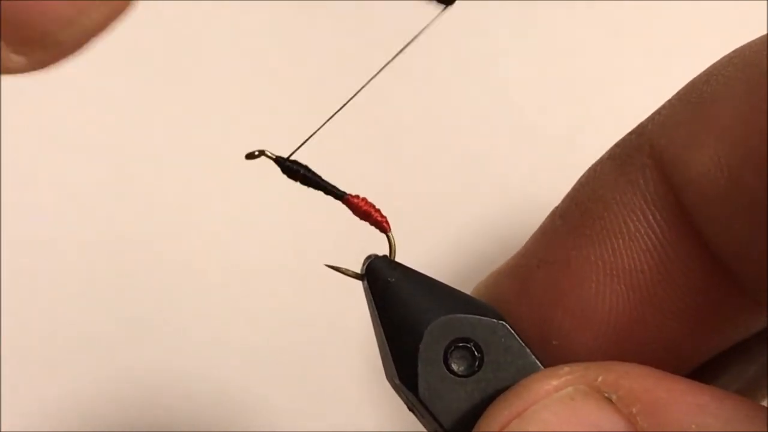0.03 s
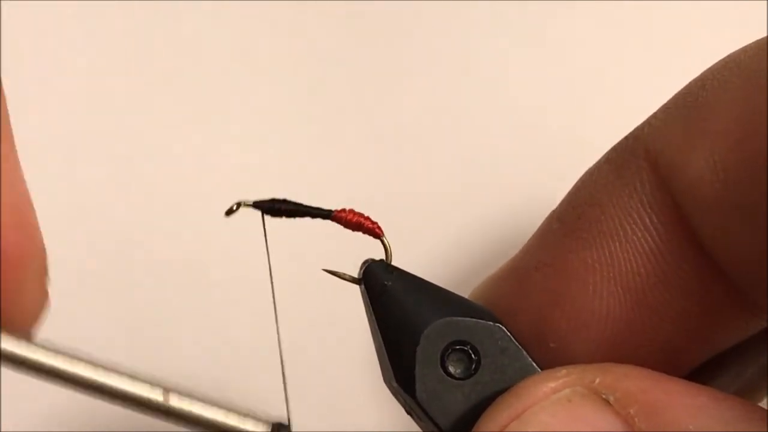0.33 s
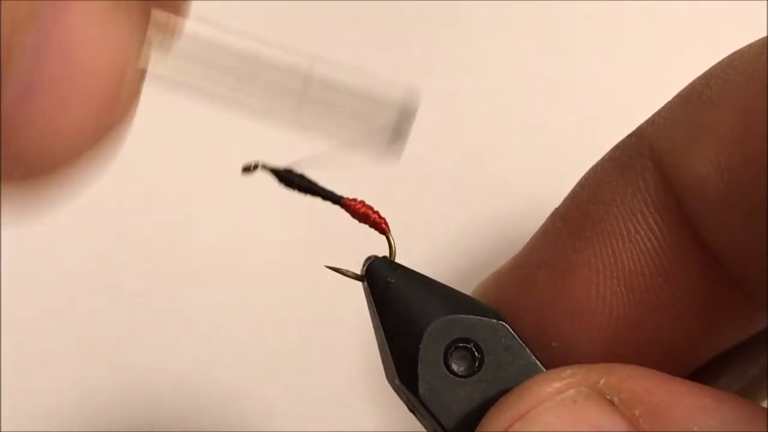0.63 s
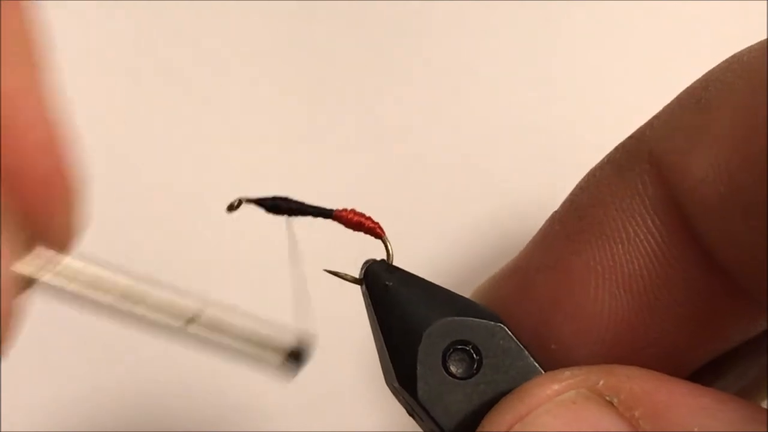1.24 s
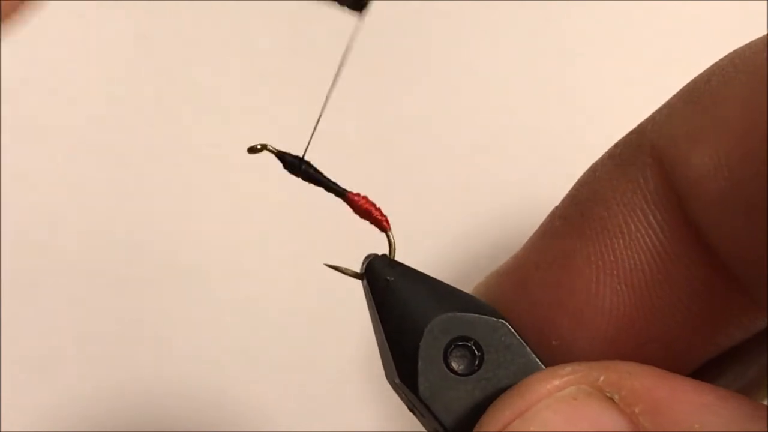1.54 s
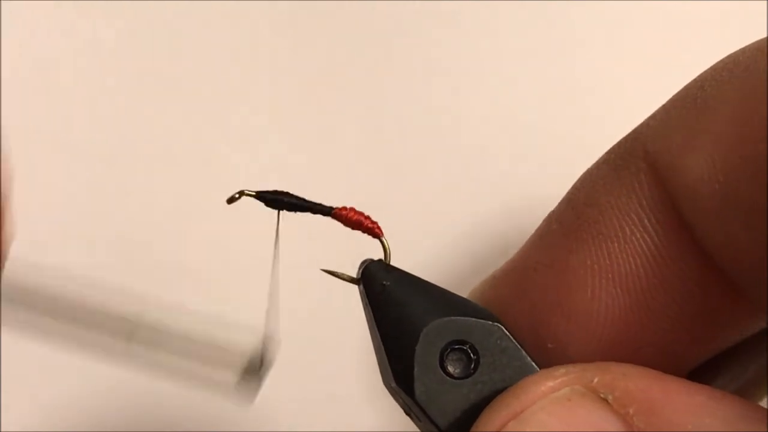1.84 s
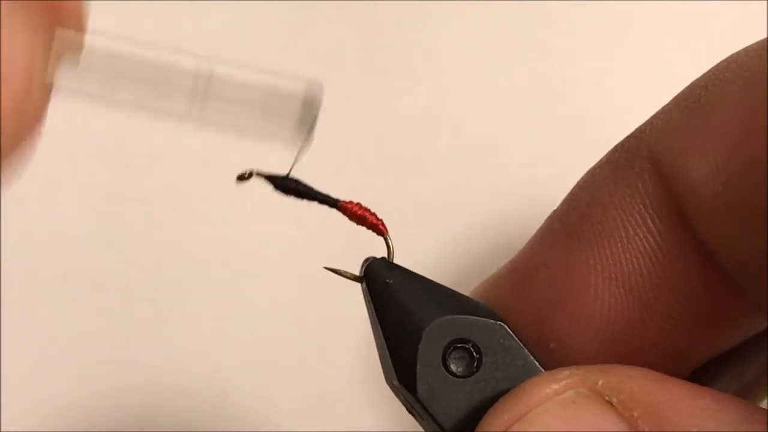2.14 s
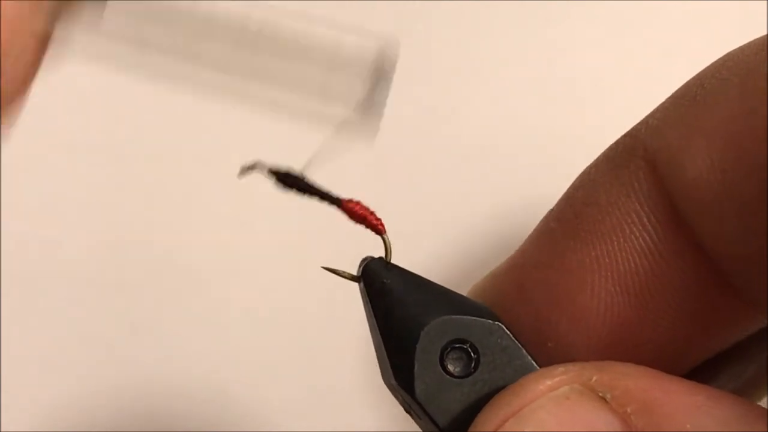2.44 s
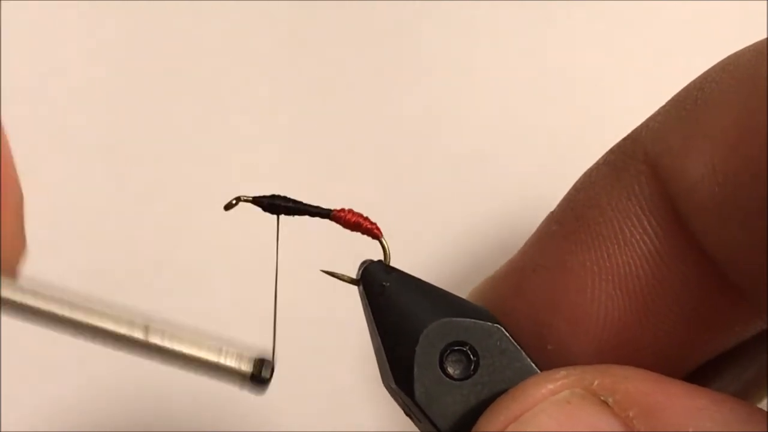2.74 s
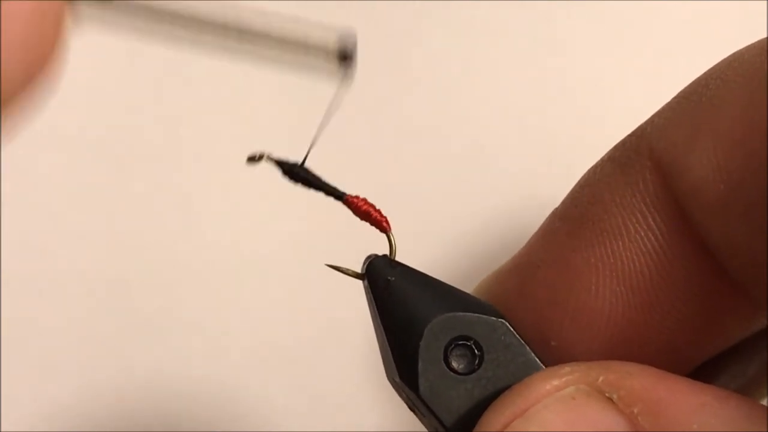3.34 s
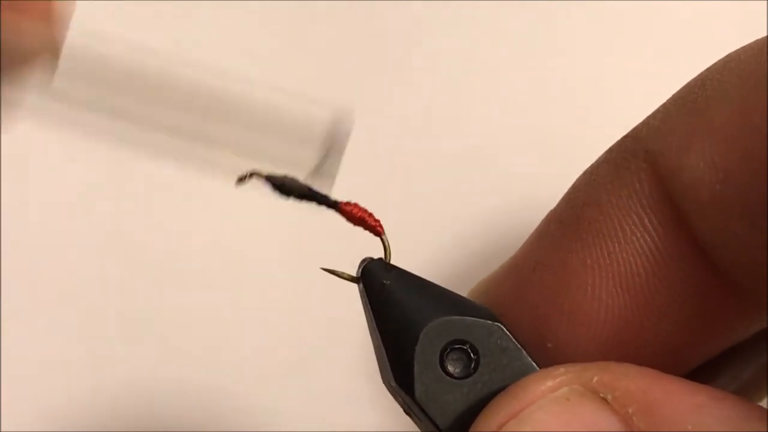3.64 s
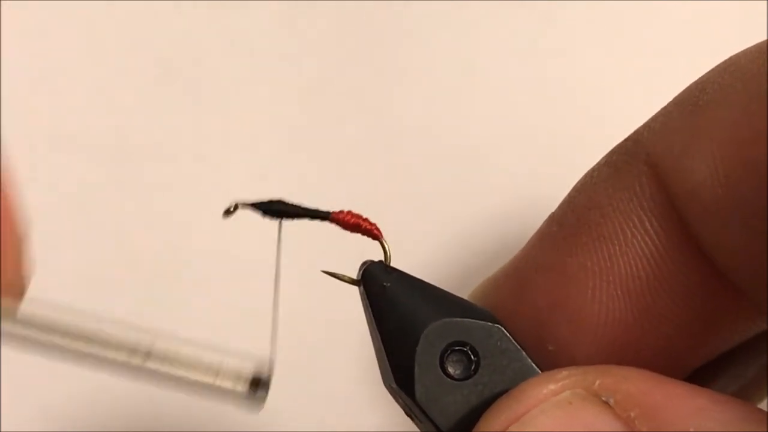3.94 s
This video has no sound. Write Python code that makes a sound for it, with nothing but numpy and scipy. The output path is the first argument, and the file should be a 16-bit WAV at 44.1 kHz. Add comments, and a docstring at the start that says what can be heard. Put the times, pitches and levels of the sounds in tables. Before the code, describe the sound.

A thread spool creaks close by in high, raspy runs of rapid ticks, about two bursts a second, with the taut thread and hook ringing faintly. The creaks are strongest and nearly continuous until about 1.7 seconds, then become shorter and fainter, with quicker ticks. At about 3.9 seconds the tool clicks, fingers rub it and a hand softly bumps the vice. A small room hums faintly throughout.

```python
"""A spool creaks in its wire holder as thread is wound round a small hook in a vice, about two turns a second.
The spool sticks and slips, and each slip is a short tick near 4 kHz. The ticks run together into
creaks, slow and strong at first, then faster and fainter. The taut thread and the hook ring along.
Near the end the tool clicks, fingers rub it and a hand bumps the vice. A small room hums."""
import sys
import numpy as np
from scipy import signal
from scipy.fft import rfft, irfft, next_fast_len
from scipy.io import wavfile
from scipy.ndimage import uniform_filter1d, map_coordinates

SR = 44100
rng = np.random.default_rng(int(sys.argv[2]) if len(sys.argv) > 2 else 0)


def put_to_file(sound):
    """Save the sound as 16-bit audio at rate SR, in the file named by the first command-line argument."""
    columns = np.atleast_2d(sound).T  # one column per channel
    safe = np.clip(columns, -1, 1)
    whole_steps = np.round(safe * 32767)
    wavfile.write(sys.argv[1], SR, whole_steps.astype(np.int16))


N = 176400

# how the spool slips, one list for each creak: time_s, slips_per_s, strength_db
SPOOL_CREAKS = [
    [(0.0087, 101.7, -38), (0.0193, 81.8, -34), (0.0468, 65.8, -33)],
    [(0.0876, 77.1, -35), (0.101, 73.2, -31), (0.1728, 66.5, -36), (0.2183, 63.2, -45), (0.2677, 59.8, -39),
     (0.3073, 91.6, -34), (0.3284, 97.0, -37), (0.35, 87.0, -32), (0.3944, 93.8, -35), (0.4294, 77.9, -50),
     (0.465, 87.1, -51)],
    [(0.4979, 146.5, -50), (0.5207, 115.6, -44), (0.5866, 96.5, -32), (0.598, 80.9, -29),
     (0.6437, 95.8, -31), (0.7116, 51.1, -37), (0.7279, 75.8, -41), (0.7651, 82.0, -41),
     (0.7795, 57.6, -39), (0.8122, 66.1, -32), (0.8369, 97.0, -31), (0.8657, 108.3, -32),
     (0.8978, 79.0, -36), (0.9105, 82.1, -36), (0.9602, 114.0, -52)],
    [(0.9775, 118.7, -50), (1.0205, 115.7, -50), (1.0372, 119.1, -38), (1.0455, 117.0, -40),
     (1.063, 115.8, -33), (1.072, 98.2, -39), (1.1181, 77.7, -36), (1.1713, 70.0, -38), (1.2077, 98.2, -47),
     (1.2382, 95.2, -45), (1.2502, 69.8, -42), (1.2979, 98.5, -34), (1.3465, 66.5, -32), (1.4, 120.8, -38),
     (1.4284, 159.7, -44), (1.4692, 141.1, -58)],
    [(1.5092, 152.8, -44), (1.5267, 190.8, -39), (1.5525, 195.0, -33), (1.5763, 140.7, -40),
     (1.5984, 133.4, -35), (1.6279, 134.8, -42), (1.6356, 128.9, -38), (1.6755, 168.7, -44),
     (1.6896, 146.2, -58)],
    [(1.7597, 163.1, -53), (1.8091, 162.1, -45), (1.8388, 241.4, -47), (1.843, 225.8, -50),
     (1.8524, 188.9, -44), (1.8651, 142.5, -49)],
    [(1.8885, 107.9, -50), (1.9263, 156.0, -46), (1.9317, 210.8, -50), (1.9545, 229.5, -62)],
    [(2.0638, 174.7, -53), (2.121, 140.7, -62), (2.1283, 127.3, -54), (2.1443, 122.6, -55)],
    [(2.2829, 151.2, -57), (2.327, 168.2, -38), (2.358, 159.5, -48), (2.3623, 172.2, -60)],
    [(2.3961, 105.0, -51), (2.43, 130.3, -42), (2.4374, 151.6, -47), (2.4434, 166.0, -44),
     (2.4659, 179.1, -59)],
    [(2.6223, 125.9, -59), (2.6491, 99.8, -54), (2.7155, 164.2, -49), (2.7473, 105.4, -43),
     (2.7694, 158.3, -48), (2.7762, 137.3, -42), (2.8109, 153.1, -43), (2.8422, 161.7, -51),
     (2.8487, 180.1, -59), (2.8734, 214.8, -57)],
    [(3.0117, 168.7, -55), (3.0176, 145.6, -50), (3.0305, 171.7, -49), (3.1193, 147.1, -62)],
    [(3.1409, 167.9, -49), (3.1666, 222.0, -48), (3.179, 266.3, -38), (3.1926, 316.4, -40),
     (3.1956, 324.0, -44)],
    [(3.3666, 349.4, -53), (3.3815, 331.7, -42), (3.3957, 366.6, -59)],
    [(3.4878, 155.6, -62), (3.5351, 179.3, -51), (3.5547, 134.6, -41), (3.5788, 199.6, -44),
     (3.5833, 188.8, -56), (3.6089, 139.7, -58)],
    [(3.7906, 203.1, -57), (3.7955, 199.6, -48), (3.8272, 243.6, -45), (3.835, 259.0, -59)],
    [(3.9724, 155.5, -54), (3.996, 181.6, -49)],
]
# the holder's main and lower rings: base_pitch_hz, relative_db, rise_s, fall_s
HOLDER_RINGS = [(3872, 0, .00046, 0.00062), (4600, -13.5, 0.00032, 0.0014), (3643, -29, 0.00074, 0.0054)]
HOLDER_LOW_RINGS = [(2853, -16, 0.0012, 0.00034), (2242, -25, 0.00066, 0.0013)]
# how much the lower rings are turned up or down: time_s, gain_db
LOW_RING_GAIN = [(.03, -1.5), (.2, -1.5), (.37, -4), (.6, -2.5), (.82, -3), (.95, 4), (1.12, 2.5),
                 (1.35, 4), (1.6, 6), (1.82, 3.5), (1.93, 10), (2.33, 1), (2.75, 1.5), (3.05, 9), (3.2, -5),
                 (3.8, 1)]
# the noisy snap of a slip: frequency_hz, relative_db
SNAP_SPECTRUM = [(600, 0.5), (2000, -19), (5000, 8), (8000, -8), (10500, -7), (12000, -4), (14000, -2),
                 (15500, -11)]
# plucks of the taut thread, one list for each swing: time_s, pitch_hz, pluck_db
THREAD_SWINGS = [
    [(.04, 4600, -51), (.06, 4400, -52), (.085, 4050, -54)],
    [(.14, 4200, -58), (.19, 4070, -50), (.24, 4170, -47), (.31, 3980, -48), (.35, 3600, -48),
     (.4, 3400, -49)],
    [(.61, 4150, -50), (.66, 4150, -49), (.73, 4170, -49), (.78, 4330, -47), (.84, 4080, -44),
     (.855, 3480, -45), (.89, 3380, -50)],
    [(1.12, 4250, -56), (1.19, 4430, -53), (1.24, 4690, -52), (1.3, 4280, -49), (1.34, 4270, -78)],
    [(2.67, 3770, -50), (2.71, 3960, -63), (2.75, 3920, -46), (2.78, 3420, -54)],
    [(3.07, 4100, -65), (3.12, 3830, -65), (3.145, 3850, -54), (3.175, 3340, -65)],
]
# the thread passes under the hook and pulls it down: time_s, width_s, low_ring_db, high_ring_db
HOOK_PULLS = [(.345, 0.046, -60, -64), (0.844, 0.086, -65, -61.5), (1.31, 0.066, -53.5, -57),
              (1.814, .035, -57.5, -63.5), (2.332, 0.015, -58, -62.5), (2.75, 0.055, -77, -75),
              (3.181, .018, -66, -66.5), (3.38, 0.015, -63.5, -72), (3.566, 0.016, -56, -63.5),
              (3.82, .015, -60, -79)]
# the hook's two rings: base_pitch_hz, ring_time_s, ahead_of_pull_s, glide_fraction_per_s
HOOK_RINGS = [(2250, 0.024, 0.0025, -0.21), (6790, 0.025, 0.014, -0.31)]
# the thread slides softly between creaks: time_s, width_s, pitch_hz, level_db
THREAD_SLIDES = [(1.73, 0.01, 4150, -66), (2.238, .012, 3860, -66), (2.292, 0.0068, 3540, -63),
                 (3.21, 0.011, 3830, -78), (3.355, 0.023, 3900, -70), (3.436, .004, 4800, -68)]
# a thin, faint whistle flickers with the ticks: time_s, width_s, pitch_hz, strength_db
HIGH_FLICKERS = [(.24, 0.035, 15000, -60), (.36, .04, 15400, -63), (.74, .04, 14340, -57),
                 (.86, .05, 15700, -58), (1.22, 0.039, 14500, -56), (1.33, .04, 15260, -54),
                 (1.81, 0.016, 15500, -56), (1.92, 0.013, 15000, -60), (2.32, .02, 15700, -60),
                 (2.44, 0.014, 15250, -59), (2.74, 0.044, 15050, -60.5), (3.17, .02, 15100, -67),
                 (3.56, .02, 15600, -61)]
# the tool clicks: time_s, strength_db
TOOL_CLICKS = [(3.873, -33)]
# the rings in that click: base_pitch_hz, relative_db, rise_s, fall_s
TOOL_RINGS = [(1510, 2, 0.00076, 0.0022), (2150, -12, 0.00017, 0.0017), (3060, -19, 0.00031, .0009),
              (4370, -26, .0005, 0.0014), (5170, -24, .0005, 0.00073), (6250, -29, 0.00043, .0008),
              (7770, -30, 0.00063, 0.0023)]
# fingers rub on the tool: time_s, strength_db, rise_s, fade_time_s
FINGER_RUBS = [(3.876, -59, 0.0015, 0.21), (3.914, -42.5, 0.0022, 0.046), (3.929, -60, 0.008, 0.52),
               (3.962, -62.5, 0.0031, 0.75)]
# the noise of that rubbing: frequency_hz, relative_db
RUB_SPECTRUM = [(290, -23), (500, 2), (670, -13), (936, 0.5), (1030, -13), (1110, -13), (1420, 1),
                (1660, -7.5), (2070, 0), (2480, -13), (2980, -3), (5130, -33), (6240, -18), (6780, -23),
                (14000, -24)]
# the hand bumps the vice: time_s, strength_db, pitch_hz, rise_s, fall_s
VICE_BUMPS = [(3.925, -54, 252, 0.00092, 0.0091), (3.94, -50, 45, .002, 0.018)]
# the room's low rumble and faint hiss: frequency_hz, relative_db
RUMBLE_SPECTRUM = [(15, -44), (25, -26.5), (57, -6), (86, -6.5), (118, -3.5), (144, -7), (208, -2.5),
                   (286, -6), (329, -12.5), (414, -12), (512, -24), (667, -24.5), (728, -21.5),
                   (768, -24.5), (900, -21), (1020, -26), (1220, -25.5), (1500, -30.5), (1700, -29.5),
                   (2210, -65), (3740, -120)]
HISS_SPECTRUM = [(1200, -40), (1800, 1), (3000, 1), (4000, -1.5), (5000, -8), (6100, -5), (7500, -10.5),
                 (9000, -6.5), (10600, -12.5), (12000, -3.5), (13000, -12), (15500, -7)]
# the tones of the room's hum: pitch_hz, average_level_db
HUM_TONES = [(101, -69.5), (162, -66), (209, -66), (285, -72), (360, -82.5), (600, -84.5), (720, -82)]

TICK_LEAD_S = 0.003  # a tick peaks this long after it starts


def spool_slips():
    """The spool slips each time it has moved on by one step. Gives (time, strength) pairs."""
    slips = []
    for creak in SPOOL_CREAKS:
        times, rates, levels = np.transpose(creak)
        t = np.arange(times[0], times[-1] + .5 / rates[-1], 1 / SR)
        steps = np.cumsum(np.interp(t, times, rates)) / SR
        slip_times = np.interp(np.arange(int(steps[-1]) + 1), steps, t)
        slips += zip(slip_times, np.interp(slip_times, times, levels))
    jitter_s, uneven_db = 0.00004, 0.6
    return [(s + jitter_s * rng.standard_normal(), amp(db + uneven_db * rng.standard_normal()))
            for s, db in slips]


def holder_ticks(slips):
    """Each slip rings the wire holder. The ticks slowly get lower and softer."""
    sink_per_s, mistune = 0.0099, 0.012  # fractions of the pitch
    out = np.zeros(N)
    for s, strength in slips:
        dip = 0.039 * bell(since_pull(s), centre=0.029, width=0.027)  # pitch drops just after a pull
        main = tick(HOLDER_RINGS, tuning=1 - sink_per_s * s + mistune * rng.standard_normal() - dip)
        low = tick(HOLDER_LOW_RINGS, tuning=1 + mistune * rng.standard_normal())
        low_gain = amp(np.interp(s, *np.transpose(LOW_RING_GAIN)))
        add(out, s - TICK_LEAD_S, strength * (main + low_gain * low))
    easing_db = -1 - 0.17 * clock()
    return amp(easing_db) * out


def slip_snaps(kicks):
    """Each slip also makes a faint snap of noise, rougher round each downward pull."""
    t = clock()
    level_db = -32 - 2.5 * t + 3.5 * bell(since_pull(t), centre=0, width=0.073)
    bursts = fade(kicks ** 0.56, fade_time_s=0.0067)  # the snap grows less than the slip does
    spread_s = 0.0028
    softened = uniform_filter1d(bursts, int(spread_s * SR))
    return amp(level_db) * softened * noise(SNAP_SPECTRUM)


def taut_thread(kicks):
    """Slips pluck the taut thread; its pitch rises and falls with each swing."""
    t, out = clock(), np.zeros(N)
    scatter_db = 2
    for swing in THREAD_SWINGS:
        times, pitches, levels = np.transpose(swing)
        plucked = (kicks > 0) * (t > times[0]) * (t < times[-1])
        strength = amp(np.interp(t, times, levels) + scatter_db * rng.standard_normal(N))
        out += ring(plucked * strength, np.interp(t, times, pitches), ring_time_s=0.036)
    return out


def hook(kicks):
    """Slips ring the hook while the thread pulls it down; the pitch slides down through each pull."""
    out, slip_samples = np.zeros(N), np.flatnonzero(kicks)
    for k, (hz, ring_time_s, ahead_s, glide) in enumerate(HOOK_RINGS):
        tugs = np.zeros(N)
        for s, width, *ring_db in HOOK_PULLS:
            tugs[slip_samples] += amp(ring_db[k]) * bell(slip_samples / SR, s - ahead_s, width)
        out += ring(tugs, hz * (1 + glide * since_pull(clock())), ring_time_s)
    return out


def sliding_thread():
    """The thread hisses softly where it slides."""
    return hisses(THREAD_SLIDES, width_hz=280)


def high_whistle(kicks):
    """A thin, faint whistle near 15 kHz flickers with the ticks."""
    return fade(np.sign(kicks), fade_time_s=0.011) * hisses(HIGH_FLICKERS, width_hz=100)


def tool_handling():
    """The tool clicks once and rustles as the fingers shift on it."""
    click, rubbing = np.zeros(N), np.zeros(N)
    for s, db in TOOL_CLICKS:
        add(click, s - TICK_LEAD_S, amp(db) * tick(TOOL_RINGS, tuning=0.921))
    for s, db, rise, fade_time_s in FINGER_RUBS:
        age = np.maximum(clock() - s, 0)
        rubbing += amp(db) * (1 - np.exp(-age / rise)) * np.exp(-np.log(1000) * age / fade_time_s)
    return click + rubbing * noise(RUB_SPECTRUM)


def vice_bumps():
    """The hand knocks the vice softly: dull, low tones that die quickly."""
    out = np.zeros(N)
    for s, db, hz, rise, fall in VICE_BUMPS:
        age = np.maximum(clock() - s, 0)
        shape = (1 - np.exp(-age / rise)) * np.exp(-age / fall)
        out += amp(db) * shape * np.sin(2 * np.pi * hz * age)
    return out


def room_echo(sound, fade_time_s=0.16, level_db=-14):
    """Sound bounces off the desk and walls, leaving a short, weak tail."""
    t = np.arange(SR // 3) / SR
    tail = rng.standard_normal(len(t)) * np.exp(-np.log(1000) * t / fade_time_s)
    return amp(level_db) * signal.fftconvolve(sound, tail / np.linalg.norm(tail))[:N]


def room_background():
    """A low rumble, a faint hiss, wavering tones and a mains hum that swells and ebbs."""
    t = clock()
    waver_db, drift_rad = 3, 0.31
    swell_db, swell_period_s, swell_peak_s = 3.5, 0.873, 0.8

    def tone(hz, db):
        phase = 2 * np.pi * hz * t + drift_rad * wobble(per_s=5.1)
        return amp(db) * np.sqrt(2) * np.sin(phase)

    hum = sum(tone(hz, db + waver_db * wobble(per_s=3.967)) for hz, db in HUM_TONES)
    swell = np.cos(2 * np.pi * (t - swell_peak_s) / swell_period_s)
    mains = tone(hz=119.95, db=-60.5 + swell_db * swell)
    return amp(-55) * noise(RUMBLE_SPECTRUM) + amp(-71.5) * noise(HISS_SPECTRUM) + hum + mains


def tick(rings, tuning):
    """A few tones that swell and die within milliseconds; tuning multiplies their pitches."""
    t = np.arange(SR // 50) / SR - TICK_LEAD_S
    out = np.zeros(len(t))
    for hz, db, rise, fall in rings:
        shape = np.where(t < 0, bell(t, 0, rise), 1 / np.cosh(t / fall))
        out += amp(db) * shape * np.sin(2 * np.pi * hz * tuning * t)
    return out


def ring(kicks, hz, ring_time_s):
    """Each kick starts a fading tone whose pitch can slide."""
    spin = np.exp(2j * np.pi * np.cumsum(hz) / SR)
    return (spin * fade(kicks / spin, ring_time_s)).imag


def fade(kicks, fade_time_s):
    """Each kick leaves a tail that drops by 60 dB in the fade time."""
    return signal.lfilter([1], [1, -np.exp(-np.log(1000) / (fade_time_s * SR))], kicks)


def since_pull(t):
    """Seconds since the nearest pull on the hook, negative before it."""
    pulls = np.array(HOOK_PULLS)[:, 0]
    halfway = (pulls[1:] + pulls[:-1]) / 2
    return t - pulls[np.searchsorted(halfway, t)]


def hisses(rows, width_hz):
    """One swell of hiss for each row, centred on that row's pitch."""
    out = np.zeros(N)
    for s, width_s, hz, db in rows:
        band = filtered(rng.standard_normal(N), lambda f: bell(f, hz, width_hz))
        out += amp(db) * bell(clock(), s, width_s) * unit(band)
    return out


def noise(spectrum):
    """Noise whose mix of low and high follows a spectrum table."""
    hz, db = np.transpose(spectrum)
    gain_at = lambda f: amp(np.interp(np.log(f + 1), np.log(hz), db))
    return unit(filtered(rng.standard_normal(N), gain_at))


def filtered(sound, gain_at):
    """Turn each frequency up or down by gain_at(frequency)."""
    size = next_fast_len(N + SR // 2)
    return irfft(rfft(sound, size) * gain_at(np.fft.rfftfreq(size, 1 / SR)), size)[:N]


def wobble(per_s):
    """A smooth curve through per_s random points a second."""
    return map_coordinates(rng.standard_normal(int(N * per_s / SR) + 4), [clock() * per_s])


def bell(x, centre, width):
    """A smooth hump of height 1."""
    return np.exp(-.5 * ((x - centre) / width) ** 2)


def add(out, start_s, sound):
    """Mix a sound into out, starting at start_s."""
    i = int(np.clip(round(start_s * SR), 0, N))
    out[i:i + len(sound)] += sound[:N - i]


def amp(db):
    """Turn decibels into a multiplier."""
    return 10 ** (np.asarray(db) / 20)


def unit(sound):
    """Scale a sound to an average (rms) level of 1."""
    return sound / np.sqrt(np.mean(sound ** 2) + 1e-20)


def clock():
    """The time of every sample, in seconds."""
    return np.arange(N) / SR


def scene():
    """The winding, heard close up in the humming room."""
    slips = spool_slips()
    kicks = np.zeros(N)  # one spike for each slip, placed as its tick rises
    tick_rise_s = HOLDER_RINGS[0][2]
    for s, strength in slips:
        add(kicks, s - tick_rise_s, np.array([strength]))
    near = holder_ticks(slips) + slip_snaps(kicks) + hook(kicks) + taut_thread(kicks)
    near += sliding_thread() + high_whistle(kicks) + tool_handling() + vice_bumps()
    return (near + room_echo(near) + room_background())[None]


def record(dry, top_hz=15900):
    """Cut away the very highest treble."""
    return filtered(dry[0], lambda hz: hz < top_hz)[None]


dry = scene()
out = record(dry)
put_to_file(out)
```